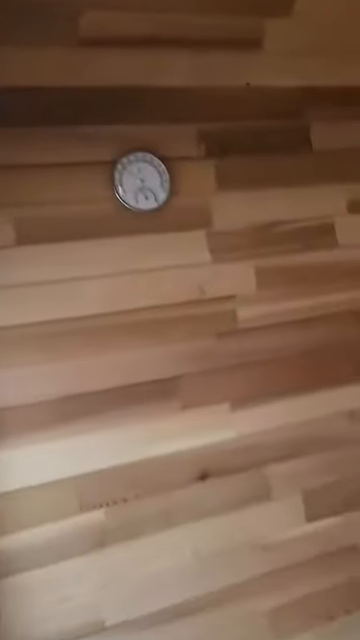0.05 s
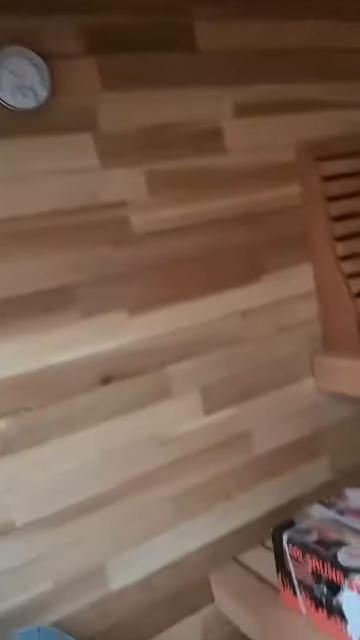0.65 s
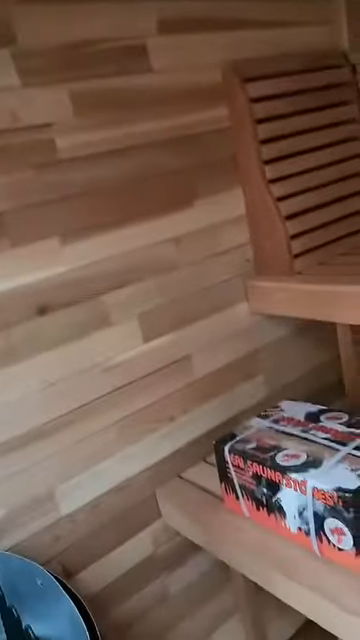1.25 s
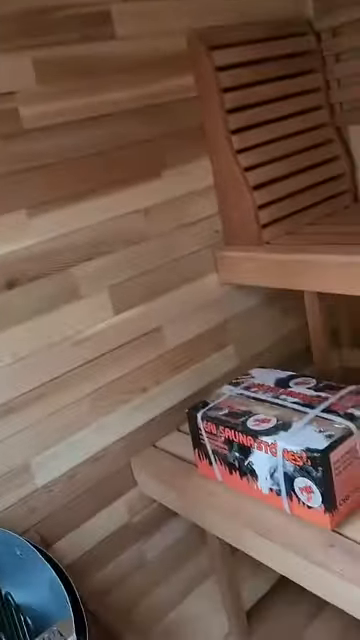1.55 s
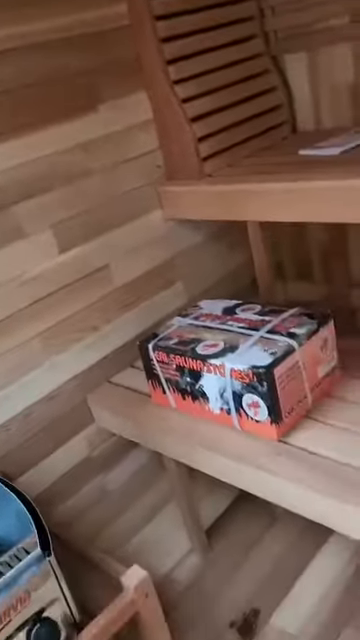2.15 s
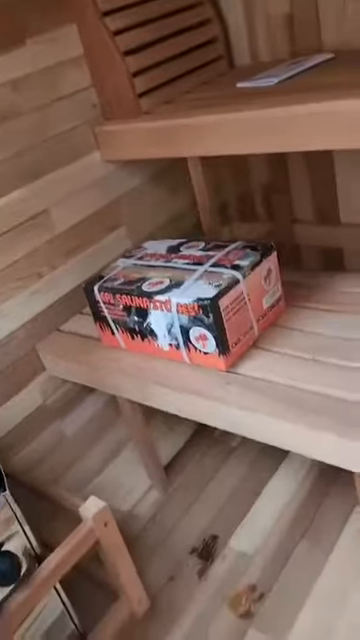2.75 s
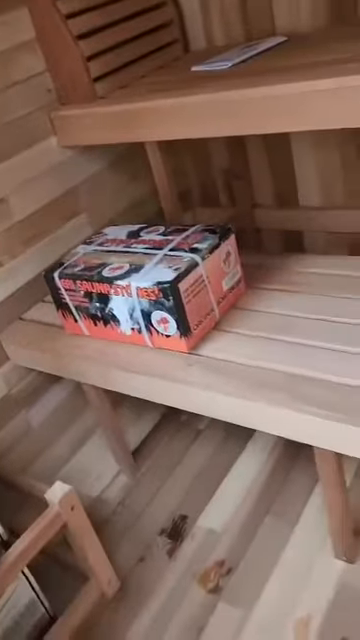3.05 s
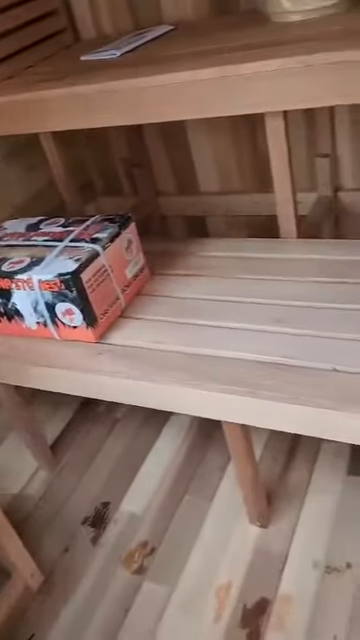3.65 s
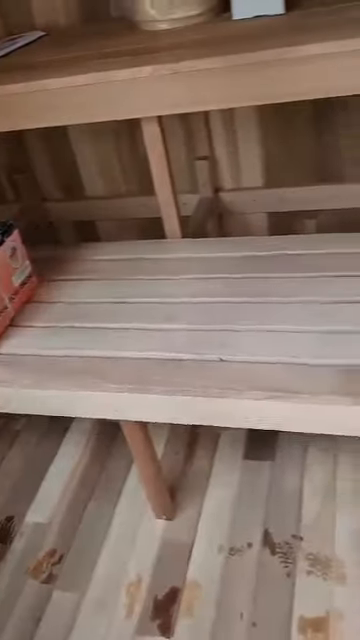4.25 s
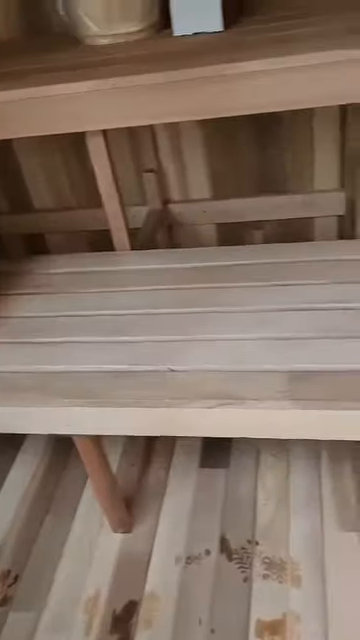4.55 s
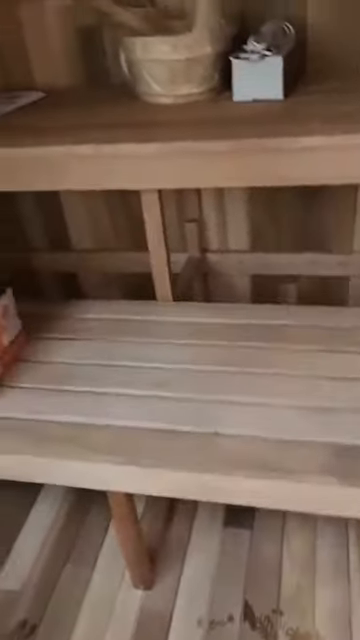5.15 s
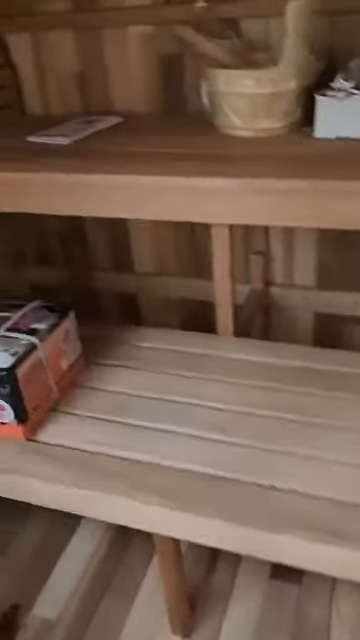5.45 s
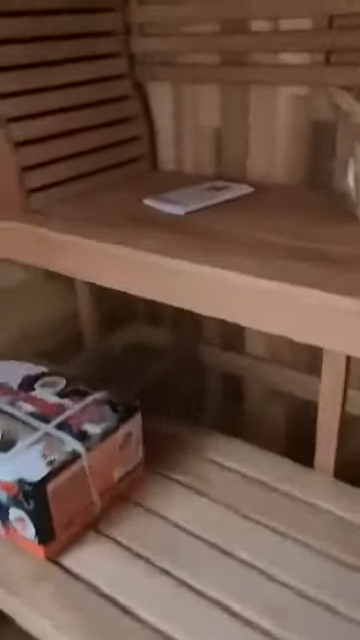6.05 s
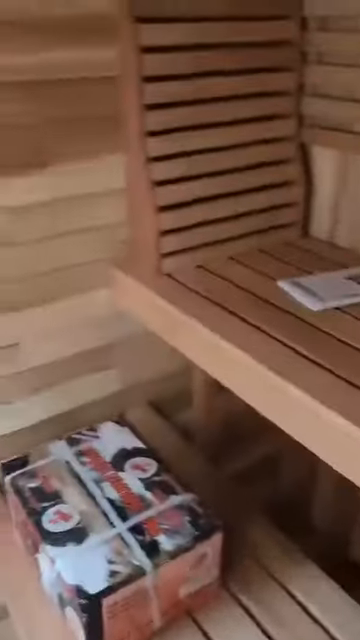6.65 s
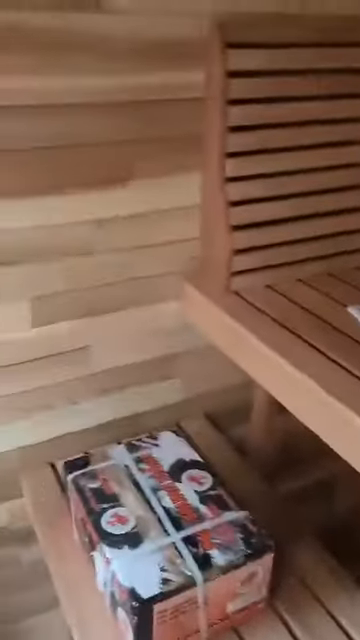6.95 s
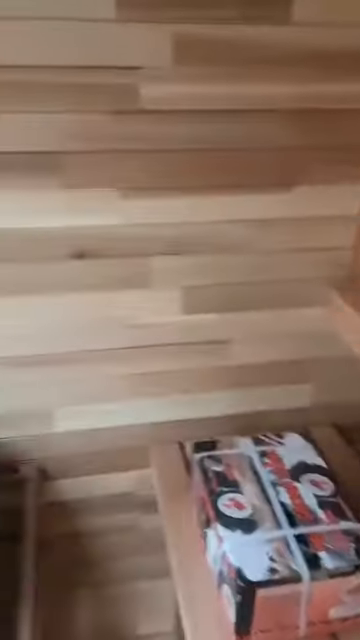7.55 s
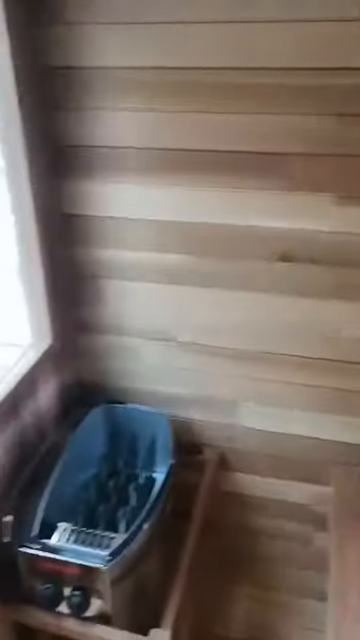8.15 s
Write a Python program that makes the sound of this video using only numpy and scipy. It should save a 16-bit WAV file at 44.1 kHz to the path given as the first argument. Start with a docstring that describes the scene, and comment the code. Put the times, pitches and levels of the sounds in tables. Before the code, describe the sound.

A fan hums and blows in a small wooden room, then heavy footsteps knock on the hollow floor close by as clothes rustle.

```python
"""Fan and footsteps in a sauna

In a small wooden cabin a fan hums and blows air. A thin whistle comes and goes as the listener moves.
Then the listener turns away, and heavy steps knock on the hollow floor close by, shaking the planks
and the beams below. Heels click, soles scuff, boards squeak and clothes rustle."""
import sys
import numpy as np
from scipy import signal
from scipy.fft import rfft, irfft
from scipy.io import wavfile

SR = 44100
rng = np.random.default_rng(int(sys.argv[2]) if len(sys.argv) > 2 else 0)


def generate_wav(signal):
    """Clip the signal to [-1, 1] and save it as 16-bit WAV at the path in sys.argv[1]."""
    frames = np.transpose(np.atleast_2d(signal))
    scaled = np.clip(frames, -1, 1) * 32767
    pcm = np.round(scaled).astype(np.int16)
    wavfile.write(sys.argv[1], SR, pcm)


N = 369999
TIME = np.arange(N) / SR

# The fan's hum as the listener moves about. Each row: time in seconds, level in dB before turning away.
HUM_LEVELS = [(0, -44), (.6, -41), (1.5, -40.5), (2.1, -38.5), (3.6, -40), (4.5, -35.5), (5.7, -39.5)]


def footsteps(flatten_s=0.014, flatten_db=-6, plank_boost_db=4, crack_fade_s=0.42):
    """Heel and sole strike a plank, which rings and shakes the whole floor and the beams under it."""
    # A fade time is how long a sound takes to drop by 60 dB. Each row: start in seconds, floor level
    # in dB, plank level in dB before its boost, plank pitch in Hz, plank fade time in seconds,
    # beam level in dB, crack level in dB. The levels set how strongly each part is struck.
    blows = [(5.787, -21.5, -1.5, 228, 0.041, -31.5, -45), (5.8, -34, -7.5, 164, 0.055, -38, -46),
             (5.816, -31, -5.5, 158, 0.062, -47, -48), (5.826, -39, -17, 315, 0.08, -50, -55),
             (5.855, -38, -10.5, 140, 0.069, -40, -67), (5.875, -36, -19, 140, 0.18, -46, -74),
             (5.977, -31.5, -27, 290, .07, -37, -51), (6.007, -39, -20, 150, 0.043, -35.5, -65),
             (6.773, -23.5, -8.5, 332, 0.04, -31, -50), (6.786, -30, -17, 300, 0.036, -38, -53),
             (6.909, -27, -13, 327, 0.03, -33, -63), (6.965, -31, -16.5, 270, 0.037, -32, -75),
             (7.398, -33.5, -20, 110, .06, -35, -59), (7.418, -31, -18, 120, 0.054, -37, -52),
             (7.439, -23, -1, 310, 0.022, -26, -47), (7.451, -27, -1, 90, 0.048, -26, -51),
             (7.456, -26, -6.5, 215, .05, -38, -60), (7.487, -25.5, -6, 140, 0.044, -38, -71),
             (7.502, -27, -14, 272, 0.095, -52, -55), (7.529, -26, -9, 110, 0.035, -26.5, -48),
             (7.546, -27, -23, 480, 0.097, -33, -56), (7.574, -35, -19, 300, 0.037, -36, -63),
             (8.066, -22, -14, 437, 0.045, -47, -37), (8.084, -24.5, -6, 100, 0.032, -29, -46.5),
             (8.087, -21, -8.5, 318, 0.048, -40, -49), (8.101, -29.5, -13.5, 430, 0.05, -46, -49),
             (8.113, -25.5, -10, 250, 0.057, -50, -65), (8.149, -31, -12, 160, .04, -43, -62),
             (8.163, -28, -18, 284, .11, -43, -52), (8.218, -28, -15, 100, .04, -27, -53),
             (8.23, -25.5, -11.5, 300, 0.042, -35, -60), (8.258, -29, -17, 270, 0.071, -33, -59),
             (8.29, -33, -21, 124, 0.088, -33, -65), (8.311, -31.5, -15, 115, 0.042, -29, -68),
             (8.339, -34, -18, 95, 0.07, -36, -66)]
    # Notes of the planks and cabin air. Each row: pitch in Hz, relative level in dB, fade time in seconds.
    floor_notes = [(120, -5, 0.6), (147.5, -8.5, 0.34), (167, -5, 0.25), (216, -5, 0.28), (243.2, -1, 0.32),
                   (275.6, -3.5, 0.2), (306.5, -4.5, 0.62), (345.8, -3, 0.25), (406.7, -6, 0.24),
                   (473, -7, 0.12), (524, -9, 0.15), (635, -10, 0.066), (930, -27.5, 0.15)]
    # Notes of the beams. Each row: pitch in Hz, relative level in dB, fade time in seconds.
    beam_notes = [(34.2, -1, 0.18), (46.3, -6.5, 1), (65.2, -10, 0.29), (84.9, 6.5, 0.4),
                  (113.8, -5.5, 0.65)]
    # A blow's dull boom and sharp crack. Each row: frequency in Hz, relative level in dB.
    boom_colour = [(50, -20), (100, -23), (150, -3), (300, -11.5), (420, -4.5), (600, -17), (900, -9),
                   (1500, -19.5), (3000, -46)]
    crack_colour = [(400, -26), (800, -23), (1150, 17), (1550, 14), (2050, 11.5), (2700, 1), (3500, -5.5),
                    (5200, -3.5), (6500, -41), (14000, -37)]
    out, t = np.zeros(N), TIME[:2 ** 15]
    for start, floor_db, plank_db, plank_hz, plank_fade_s, beam_db, crack_db in blows:
        plank = np.sin(2 * np.pi * plank_hz * t) * rise(t, 0.0043) * fade(t, plank_fade_s)
        thud = ring(beam_notes, t) * rise(t, 0.0051)  # heavy beams take a moment to start
        crack = echoes(crack_colour, t) * rise(t, 0.0019) * fade(t, crack_fade_s)
        add(out, start, from_db(plank_db + plank_boost_db) * plank)
        add(out, start, from_db(beam_db) * thud + from_db(crack_db) * crack)
        cutoff_hz = 615 * 2 ** ((crack_db + 45) / 52)  # harder blows are brighter
        soften = signal.butter(2, cutoff_hz, fs=SR, output="sos")
        # The foot flattens just after each blow and strikes again, more softly.
        flat_at = start + flatten_s * (1 + 0.206 * rng.uniform(-1.084, 1))
        for touch_at, touch_db in ((start, floor_db), (flat_at, floor_db + flatten_db)):
            floor = from_db(-1) * ring(floor_notes, t) + from_db(-9) * echoes(boom_colour, t)
            add(out, touch_at, from_db(touch_db) * signal.sosfilt(soften, floor))
    return out


def heel_clicks(rise_s=0.00082, roughness=0.41):
    """A hard heel edge taps a small patch of wood, which rings briefly and roughly."""
    # Each row: start in seconds, level in dB, pitch in Hz, fade time in seconds.
    taps = [(5.785, -39, 2476, 0.09), (5.788, -34.5, 1120, 0.064), (5.796, -32.5, 2040, 0.045),
            (5.801, -24, 660, 0.07), (6.713, -50, 2310, 0.068), (6.786, -45.5, 2300, 0.088),
            (7.44, -43.5, 2000, 0.08), (7.446, -30, 877, 0.078), (7.473, -33, 726, 0.094),
            (7.531, -29, 637, 0.12), (8.073, -31, 1290, 0.045), (8.075, -36, 1950, .06),
            (8.101, -35.5, 1030, 0.12)]
    out, t = np.zeros(N), TIME[:2 ** 13]
    for start, db, hz, fade_s in taps:
        phase = phase_of(hz * (1 + roughness * rng.standard_normal(len(t))))
        add(out, start, from_db(db) * rise(t, rise_s) * fade(t, fade_s) * np.sin(phase))
    return out


def board_creaks(overtone_db=-20, jitter=0.15):
    """A loaded plank slips against its neighbour in a brief, unsteady squeak."""
    # Each row: start in seconds, level in dB, length in seconds, pitch in Hz.
    squeaks = [(8.2, -32.5, 0.026, 795), (8.227, -39, 0.017, 760), (8.279, -39, 0.018, 767)]
    out = np.zeros(N)
    for start, db, length, hz in squeaks:
        swell = np.hanning(int(length * SR))
        phase = phase_of(hz * (1 + jitter * rng.standard_normal(len(swell))))
        add(out, start, from_db(db) * swell * (np.sin(phase) + from_db(overtone_db) * np.sin(2 * phase)))
    return out


def sole_scuffs(grain_db=1.0, echo_db=-6, echo_fade_s=0.31):
    """Soles catch and slip on the boards, and each scuff lingers between the walls."""
    # Each row: start in seconds, level in dB, rise time in seconds, fade time in seconds.
    scuffs = [(6.714, -67, .004, .12), (6.971, -45.5, 0.0035, 0.085), (7.116, -39, 0.0055, 0.13),
              (7.522, -49, 0.004, 0.14), (7.544, -44.5, 0.002, 0.08)]
    # The scraping noise. Each row: frequency in Hz, relative level in dB.
    scuff_colour = [(600, 12), (1400, -5.5), (2200, -5), (3100, -10.5), (5000, -7), (7000, -7.5),
                    (8600, -11), (10000, -17), (11800, -8), (14000, -11)]
    strokes, t = np.zeros(N), TIME[:SR // 2]
    for start, db, rise_s, fade_s in scuffs:
        after_peak = np.maximum(t - rise_s, 0)
        fall = np.hypot(fade(after_peak, fade_s), from_db(echo_db) * fade(after_peak, echo_fade_s))
        add(strokes, start, from_db(db) * np.minimum(t / rise_s, 1) * fall)
    return strokes * noise(scuff_colour) * from_db(grain_db * drift(700))


def fan_hum(shaft_hz=30.245, wander=0.0014, turn_loss_db=8):
    """The spinning fan makes tones at whole multiples of its turning rate."""
    # The blade tone comes first. Each row: multiple of the turning rate, relative level in dB.
    tones = [(9, 1), (10, -26.5), (16, -31.5), (17, -25), (20, -27)]
    shaft_angle = phase_of(shaft_hz * (1 + wander * drift(2.97)))
    hum = 0
    for multiple, db in tones:
        waver_db = 1.5 if multiple == tones[0][0] else 5.5  # the blade tone is the steadiest
        hum += from_db(db + waver_db * drift(6)) * tone(multiple * shaft_angle + 2 * np.pi * rng.random())
    return hum * level(HUM_LEVELS) * from_db(-turn_loss_db * turned())


def fan_whistle(hz=1133, jitter=0.47, waver_db=3):
    """The fan's thin, wavering whistle comes and goes as the listener moves."""
    # Each row: time in seconds, level in dB.
    whistle_levels = [(0, -55), (.15, -56.5), (.38, -62), (.5, -72), (.75, -69), (.85, -61), (1.17, -56.5),
                      (1.37, -73), (1.58, -53), (1.9, -52), (2.11, -71), (2.27, -52), (2.4, -52),
                      (2.55, -71), (2.72, -58.5), (3.05, -56), (3.15, -65), (3.48, -62.5), (3.7, -80)]
    whistle = tone(2 * np.pi * hz * TIME + jitter * drift(60))
    return level(whistle_levels) * whistle * from_db(waver_db * drift(25))


def air_rumble(flow_db=-37.5, turn_loss_db=3, between_spots_db=-53.5):
    """Moving air rumbles in the cabin, and a standing wave between the walls makes loud spots."""
    # The listener passes through the loud spots. Each row: middle and length in seconds, level in dB.
    loud_spots = [(.7, 0.42, -45), (2.1, 0.43, -39.5), (2.9, 0.67, -41), (4.05, 1.66, -39),
                  (5.45, 0.3, -39), (7.8, 1.4, -45.5)]
    # The rumble and the standing wave. Each row: frequency in Hz, relative level in dB.
    rumble_colour = [(20, -11.5), (50, -3.5), (70, -3.5), (90, -2), (118, 5.5), (135, -2), (152, 0),
                     (178, -5), (207, -1.5), (250, -4.5), (300, 1.5), (370, -4), (450, -10), (600, -17.5)]
    standing_colour = [(65, -19), (84, -10), (99, -2.5), (108, -1.5), (118, 2), (128, -9.5), (142, -11.5)]
    rumble = from_db(flow_db - turn_loss_db * turned()) * nearness() ** 0.16 * noise(rumble_colour)
    standing = (swells(loud_spots) + from_db(between_spots_db)) * noise(standing_colour)
    return (rumble + standing) * from_db(1.02 * drift(9))  # the flow swells unevenly


def air_rush(rush_db=-50, flicker_db=-69.5, turn_loss_db=3):
    """The fan's air rushes, at times with a low, breathy whistle."""
    # These join the thin whistle's strongest swells. Each row: middle and length in seconds, level in dB.
    breathy_swells = [(1.65, .16, -51.5), (1.88, .26, -56), (2.3, .1, -54)]
    # The tone colours of the four noises below. Each row: frequency in Hz, relative level in dB.
    rush_colour = [(300, -23), (480, -2.5), (620, -2.5), (800, -5.5), (1050, -10), (1400, -13),
                   (2000, -19.5), (2800, -25), (3700, -29.5), (4400, -26), (5800, -36.5), (8100, -39.5),
                   (9700, -50.5), (13000, -46)]
    hollow_colour = [(480, -14.5), (700, 6), (900, -14.5), (1150, -18)]
    breathy_colour = [(930, -29), (995, 5), (1025, -3), (1090, -29)]
    flicker_colour = [(1300, -16.5), (1600, 0.5), (1850, 2.5), (2150, -3.5), (2700, -8)]
    rush = from_db(rush_db) * nearness() ** 0.051 * noise(rush_colour)
    hollow = swells([(4.65, 1.3, -52.5)]) * noise(hollow_colour)  # hollower in front of the benches
    breathy = swells(breathy_swells) * noise(breathy_colour)
    # A faint, patchy mid-high hiss flickers above the rush.
    flicker = from_db(flicker_db + 3 * drift(14)) * noise(flicker_colour)
    return (rush + flicker) * from_db(-turn_loss_db * turned()) + hollow + breathy


def clothes_rustle(still_db=-78.5, walking_db=-67.5, grain_db=1.0):
    """Cloth catches and slips hundreds of times a second as the body moves."""
    # Clothes rub and sleeves sweep past. Each row: middle and length in seconds, level in dB.
    rubs = [(.18, 0.31, -70), (.9, .06, -77), (1.09, 0.12, -72), (1.4, 0.07, -82), (5.17, 1, -63.5),
            (5.73, 0.15, -58), (5.88, 0.16, -65.5), (6.09, 0.23, -58.5), (6.29, 0.1, -66),
            (6.82, 0.092, -61), (7.06, 0.17, -63), (7.68, 0.12, -60.5)]
    swishes = [(3.7, 0.15, -66), (3.96, 0.42, -64.5), (4.85, 1, -67), (5.72, 0.25, -73), (6.1, 0.17, -54.5),
               (6.27, 0.19, -59), (8.2, 0.33, -65.5)]
    # The noise of a rub and of a swish. Each row: frequency in Hz, relative level in dB.
    rub_colour = [(1200, -8.5), (2300, 0), (3300, -0.5), (4500, -0.5), (5400, -1), (7800, -3), (9000, -7.5),
                  (11000, -8.5), (12200, -2), (14000, -6)]
    swish_colour = [(1200, -16), (2200, -2), (3300, 1.5), (3800, -1.5), (4300, 1.5), (4650, -3),
                    (5000, -0.5), (5900, -2.5), (6700, -10.5), (9000, -18.5), (12000, -23.5), (14000, -21)]
    rustle = from_db(still_db + (walking_db - still_db) * turned())
    cloth = np.hypot(rustle, swells(rubs)) * noise(rub_colour) + swells(swishes) * noise(swish_colour)
    return cloth * from_db(grain_db * drift(400) + 1.5 * drift(30))


def sleeve_zips(width_hz=850):
    """Ribs of cloth slide over each other: a narrow hiss whose pitch follows the sleeve's speed."""
    # Each row: middle and length in seconds, level in dB, pitch in Hz, glide in octaves per second.
    sweeps = [(4.75, .6, -71, 4450, 0), (5.74, 0.11, -62.5, 4400, .3), (6.04, .09, -56, 4160, -.6),
              (6.113, .11, -57, 4320, .9), (6.082, 0.14, -61, 5620, .3), (8.24, .3, -68, 4240, .3)]
    out = 0
    for middle, length, db, hz, glide in sweeps:
        phase = phase_of(hz * 2 ** (glide * np.clip(TIME - middle, -length, length)))
        hiss = drift(width_hz) * np.cos(phase) + drift(width_hz) * np.sin(phase)
        out += swells([(middle, length, db)]) * hiss
    return out


def motor_whine(waver_db=2):
    """The fan's motor adds two faint, high, unsteady tones."""
    # Each row: pitch in Hz, level in dB.
    tones = [(4267, -89), (8062, -92)]
    return sum(from_db(db + waver_db * drift(1.6)) * tone(2 * np.pi * hz * TIME + 2 * drift(40))
               for hz, db in tones)


def echoes(colour, t):
    """Sound bounces between the walls and blurs into noise whose high octaves die first."""
    # The cabin's echo. Each row: frequency in Hz, fade time in seconds.
    fade_times = [(100, 0.6), (300, 1), (700, 0.24), (2000, 0.32), (10000, .16)]
    spectrum = rfft(noise(colour, size=len(t)))
    octave = np.round(np.log2(np.maximum(np.fft.rfftfreq(len(t), 1 / SR), 64)))
    return sum(irfft(spectrum * (octave == k), len(t)) * fade(t, at_hz(fade_times, 2 ** k))
               for k in np.unique(octave))


def ring(notes, t):
    """Struck wood rings; each blow lands elsewhere and shares its force differently among the notes."""
    shares_db = 1.5 * rng.standard_normal(len(notes))
    return sum((-1) ** k * from_db(db + shares_db[k]) * fade(t, fade_s) * np.sin(2 * np.pi * hz * t)
               for k, (hz, db, fade_s) in enumerate(notes))


def turned(start_s=5.52, length_s=0.85):
    """How far the listener has turned from the fan and begun to walk, from 0 to 1."""
    return np.clip((TIME - start_s) / length_s, 0, 1)


def nearness():
    """A gain around 1 that grows nearer the fan."""
    return rms_one(level(HUM_LEVELS))


def swells(rows, squareness=2.36):
    """Smooth rises and falls in gain; a squareness of 2 is a bell shape, more flattens the top."""
    return sum(from_db(db) * np.exp(-np.abs(2 * (TIME - middle) / length) ** squareness)
               for middle, length, db in rows)


def noise(colour, size=N):
    """Noise of strength 1, shaped by a colour table and falling away past its ends."""
    hz = np.fft.rfftfreq(size, 1 / SR)
    ends = np.minimum(1, hz / colour[0][0]) ** 2 * np.minimum(1, colour[-1][0] / (hz + 1)) ** 4
    return rms_one(irfft(rfft(rng.standard_normal(size)) * from_db(at_hz(colour, hz)) * ends, size))


def drift(per_second):
    """A random wobble of strength 1 that heads for a new value so many times a second."""
    points = rng.standard_normal(int(N / SR * per_second) + 2)
    return rms_one(np.interp(TIME * per_second, np.arange(len(points)), points))


def rise(t, seconds):
    """A gain that climbs from 0 towards 1."""
    return 1 - np.exp(-t / seconds)


def fade(t, seconds):
    """A gain that drops by 60 dB in the given time."""
    return from_db(-60 * t / seconds)


def tone(phase):
    """A sine wave of strength 1."""
    return np.sqrt(2) * np.sin(phase)


def phase_of(hz):
    """The running angle of a changing pitch."""
    return 2 * np.pi * np.cumsum(hz) / SR


def level(rows):
    """Gain over time from rows of seconds and dB."""
    return from_db(np.interp(TIME, *np.transpose(rows)))


def at_hz(rows, hz):
    """Read between a table's rows, with octaves evenly spaced."""
    frequencies, values = np.transpose(rows)
    return np.interp(np.log(hz + 1e-9), np.log(frequencies), values)


def from_db(db):
    """Turn decibels into gain."""
    return 10 ** (np.asarray(db) / 20)


def rms_one(x):
    """Scale to an average strength (rms) of 1."""
    return x / np.sqrt(np.mean(x ** 2) + 1e-20)


def add(out, start_s, sound):
    """Mix a sound in at its start time."""
    start = int(start_s * SR)
    out[start:start + len(sound)] += sound[:N - start]


def scene():
    """The fan, the steps and the clothes in one channel."""
    fan = fan_hum() + fan_whistle() + motor_whine() + air_rumble() + air_rush()
    steps = footsteps() + heel_clicks() + board_creaks() + sole_scuffs()
    return (fan + steps + clothes_rustle() + sleeve_zips())[None]


def record(dry):
    """Cut the highest treble steeply."""
    cutoff_hz = 14150
    return signal.sosfilt(signal.ellip(12, .1, 80, cutoff_hz, fs=SR, output="sos"), dry)


dry = scene()
out = record(dry)
generate_wav(out)
```